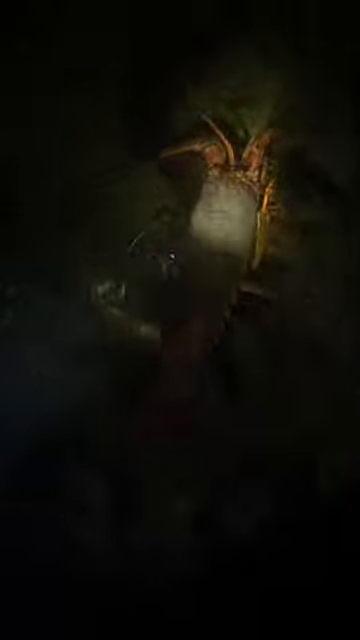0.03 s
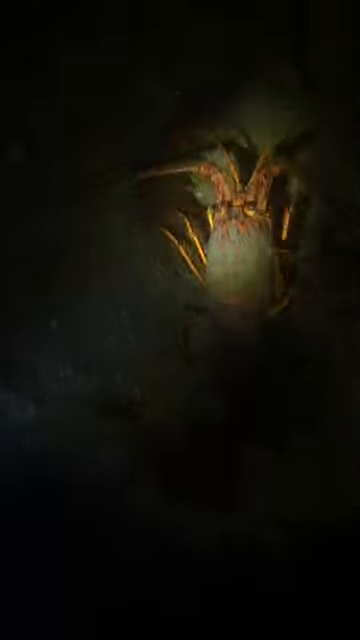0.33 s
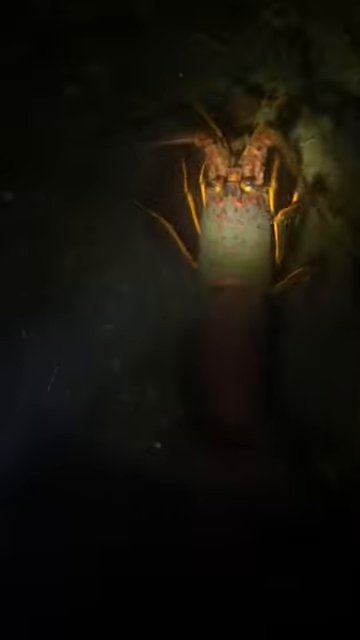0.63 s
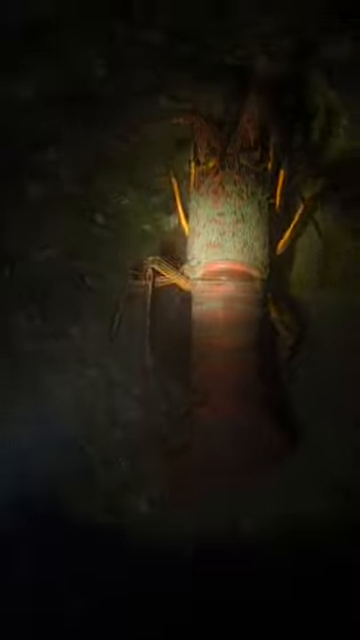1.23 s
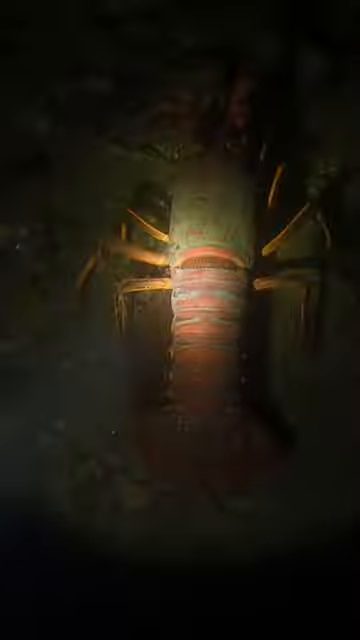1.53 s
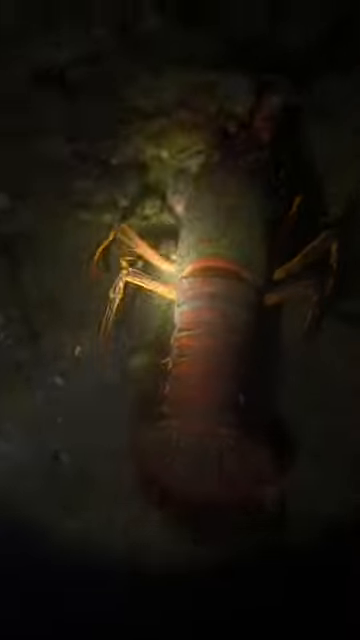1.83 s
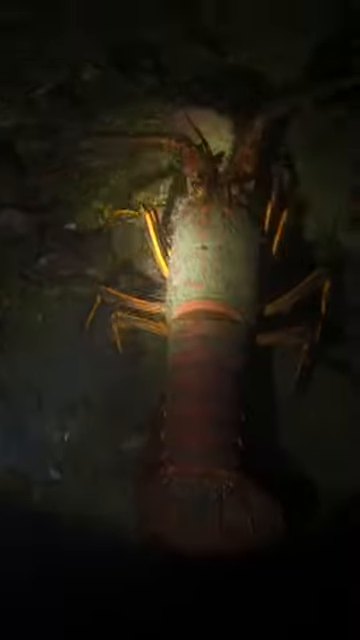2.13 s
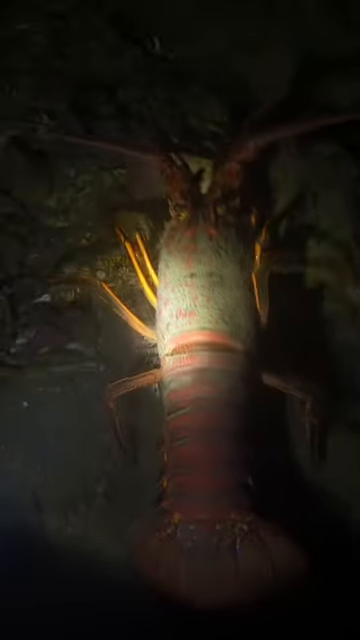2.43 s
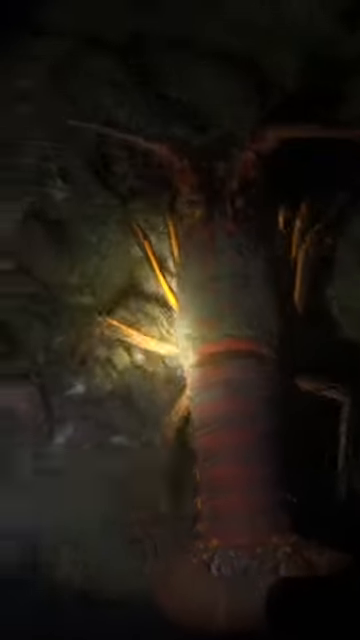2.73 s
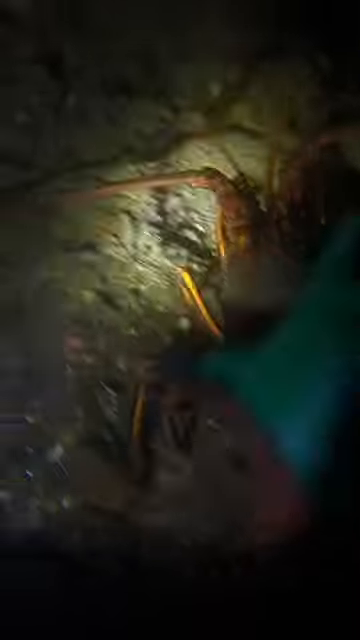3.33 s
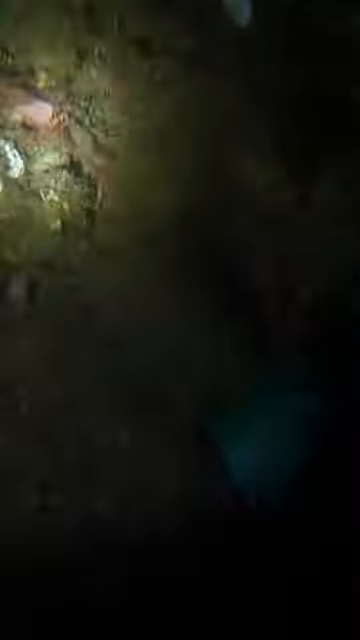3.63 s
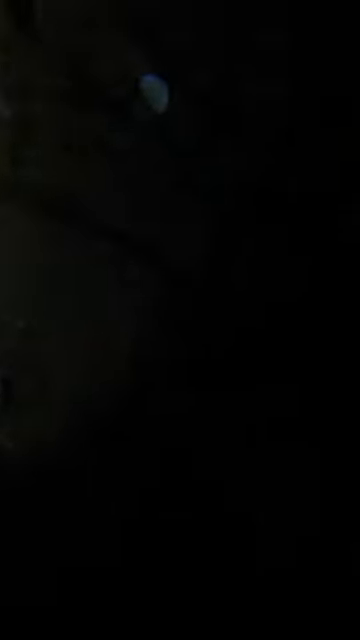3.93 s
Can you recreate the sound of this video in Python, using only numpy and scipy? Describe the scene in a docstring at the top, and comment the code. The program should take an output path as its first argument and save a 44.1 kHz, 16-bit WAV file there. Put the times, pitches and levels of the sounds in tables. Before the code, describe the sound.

A low underwater rumble runs throughout, heard from inside a camera housing, with a faint boat hum and scattered shrimp snaps. Gear bumps softly around 0.9, 2.3 and 2.7 seconds, and two taps come near 2.2. At 3.3 seconds water surges and a lobster's shell faintly scrapes rock. Dull knocks land at 3.4 and, louder, 3.6 seconds, with dry taps and short creaks until 4.

```python
"""A rocky seabed at night, heard from inside a camera housing as a diver grabs a spiny lobster.
Moving water rumbles against the housing and a far boat engine hums. Snapping shrimp crackle all
around; the rocks smear their snaps and the housing rings with them. Gear bumps softly on the seabed.
The grab, a little after three seconds, brings a surge of water, two dull knocks, dry taps on the
housing, short creaks of the gear and scrapes of shell on rock."""
import sys
import numpy as np
from scipy import signal
from scipy.fft import rfft, irfft, next_fast_len
from scipy.io import wavfile
from scipy.ndimage import uniform_filter1d, minimum_filter1d, map_coordinates

SR = 44100
rng = np.random.default_rng(int(sys.argv[2]) if len(sys.argv) > 2 else 0)


def store_wav(level_fs):
    """Save 16-bit WAV to argv[1]."""
    pcm = np.round(np.clip(np.atleast_2d(level_fs), -1, 1) * 32767)
    wavfile.write(sys.argv[1], SR, pcm.T.astype(np.int16))


N = 176400  # 4 seconds

# Levels in the tables are relative. A "decay" is the time a sound takes to fade by 60 dB.
# Water pushing on the housing: time_s, level_db
FLOW_LEVELS = [(0, -31.5), (.7, -39), (.82, -33), (1.0, -32), (1.9, -35), (2.25, -25), (2.38, -22.5),
               (2.46, -26), (2.53, -29.5), (2.7, -27.5), (3.2, -33), (3.32, -18), (3.42, -17.5),
               (3.46, -30), (3.52, -20.5), (3.565, -18), (3.6, -30), (3.69, -36), (3.85, -39.5), (4, -24)]
# Tone of that push: frequency_hz, level_db
FLOW_SPECTRUM = [(8, -1), (18, 9), (36, 1), (50, -1), (70, -15.5), (110, -21), (220, -40.5), (500, -89)]
# The sea's own rumble: time_s, level_db
RUMBLE_LEVELS = [(0, -33), (2.1, -29.5), (2.6, -33), (3.2, -30.5), (3.35, -30.5), (3.58, -24), (3.66, -40),
                 (4, -38.5)]
# Tone of the rumble: frequency_hz, level_db
RUMBLE_SPECTRUM = [(25, -30), (50, -13.5), (66, 2), (80, -7.5), (108, 1.5), (135, -11), (160, -14.5),
                   (220, -20), (500, -84)]
# The wash of water above the rumble: time_s, level_db
WASH_LEVELS = [(0, -37.5), (2.2, -39), (2.6, -40), (3.25, -40), (3.45, -37.5), (3.6, -37.5), (3.66, -53),
               (3.85, -45), (4, -39.5)]
# Tone of the wash: frequency_hz, level_db
WASH_SPECTRUM = [(60, 7.5), (130, -6.5), (200, -2.5), (290, 6.5), (360, -0.5), (470, 2), (620, -5),
                 (800, -24.5), (1200, -29.5), (3000, -76)]
# The engine's low hum: time_s, level_db
HUM_LEVELS = [(0, -32.5), (2.2, -30.5), (3.3, -30.5), (3.58, -33.5), (3.66, -44.5), (4, -36)]
# The engine's higher whine: time_s, level_db
WHINE_LEVELS = [(0, -49), (1.0, -42), (2.1, -44.5), (2.6, -48.5), (3.5, -46), (3.7, -60.5)]
# Crackle of far shrimp: time_s, level_db
CRACKLE_LEVELS = [(0, -59), (1.8, -57), (2.05, -53), (2.45, -56.5), (2.7, -52.5), (3.15, -56), (3.4, -58),
                  (3.58, -56.5), (3.65, -65), (4, -60)]
# The housing's ring under the crackle: frequency_hz, level_db
HOUSING_SPECTRUM = [(1300, -51), (1470, -10), (1510, -2.5), (1580, 0.5), (1630, -11.5), (1800, -51.5)]
# Snaps of nearby shrimp: start_s, level_db, brightness_db_per_octave, decay_s, housing_ring_hz
NEAR_SNAPS = [(.01, -37, 2, 0.065, 1470), (.157, -42, -6, 0.069, 3250), (0.2828, -48, -8, 0.064, 1570),
              (.302, -29.5, -1.5, 0.078, 3200), (0.4375, -30, 1, 0.022, 2420),
              (0.5451, -38.5, 1.5, 0.078, 2380), (0.7403, -33.5, -4, 0.067, 2350),
              (.822, -52, 0, 0.014, 2380), (0.889, -62, -8, 0.022, 1590), (0.9084, -33.5, -1, 0.11, 1530),
              (0.979, -30, -4.5, 0.025, 1560), (1.054, -36.5, 7.5, 0.019, 3280),
              (1.1337, -22.5, 3.5, 0.013, 2550), (1.247, -41, 2, 0.048, 1570),
              (1.3265, -39, 4.5, .05, 2380), (1.341, -39.5, 3, 0.09, 1560), (1.369, -49, 7.5, 0.037, 2380),
              (1.4899, -20, 0, 0.014, 3360), (1.5339, -22, 2, 0.007, 2380), (1.7082, -26, -6, 0.055, 1570),
              (1.713, -26, -3.5, 0.036, 2500), (1.8178, -24, 1, 0.018, 3900), (1.926, -29, 6, 0.02, 1620),
              (1.937, -33, 0.5, 0.055, 2380), (2.0185, -31.5, -2, 0.029, 2380),
              (2.038, -33.5, -2, 0.043, 1510), (2.1148, -29, -3, 0.021, 1590),
              (2.2569, -40, -1.5, 0.14, 3350), (2.4341, -35.5, -7, 0.024, 2400),
              (2.597, -40.5, 0.5, 0.13, 2380), (2.7092, -28, 0.5, 0.016, 1580),
              (2.7354, -32.5, -4.5, 0.07, 2450), (2.828, -36.5, -1.5, 0.037, 2350),
              (3.05, -35.5, -6, 0.065, 1696), (3.136, -45, -5, 0.046, 1570), (3.255, -35.5, 0, 0.022, 4850),
              (3.34, -20, -1, 0.033, 3100), (3.386, -39, 1.5, 0.038, 2900),
              (3.4391, -16, -2.5, 0.015, 1560), (3.453, -26.5, -7, 0.022, 1560),
              (3.5343, -23, -7, 0.018, 4900)]
# Tone of a snap: frequency_hz, level_db
SNAP_SPECTRUM = [(300, -43.5), (800, -26), (1080, -2), (1290, -10.5), (1420, -19), (1510, 5), (1580, 4),
                 (1680, 2.5), (1760, 2), (2020, -5.5), (2380, 3), (2800, -2), (3100, -4), (3380, -2),
                 (3650, -10.5), (4020, -4), (4300, -8.5), (4850, -4.5), (5400, -14.5), (6400, -22.5),
                 (7500, -25.5), (9200, -42), (10500, -42.5), (12500, -41.5), (15000, -58)]
# Which side hears the snaps louder: frequency_hz, left_minus_right_db
SNAP_SIDES = [(700, -9), (1400, 4.5), (2000, -2), (2900, 5.5), (4100, -6), (5800, -3.5), (8000, -0.5),
              (12000, 13.5)]
# How alike crisp sounds are in the two microphones: frequency_hz, likeness (1 or more is identical)
LIKENESS = [(1000, 1.27), (1700, 1.3), (2500, 0.55), (4000, 0), (8000, 0.3)]
# Gear bumping the seabed: start_s, level_db, pitch_hz
GEAR_BUMPS = [(0.911, -19.5, 90), (2.273, -27.5, 181), (2.691, -23.5, 161.7), (3.613, -17, 70),
              (3.84, -27, 170)]
# Taps on the housing: start_s, level_db, left_minus_right_db, rise_s
HOUSING_TAPS = [(2.1443, -16.5, -36, 0.00028), (2.1711, -11, -38.5, 0.000055),
                (3.301, -27, -13.5, 0.000075), (3.4865, -15.5, -36, 0.00021), (3.64, -28.5, 11.5, 0.000068),
                (3.7122, -15.5, -35, 0.000045), (3.7212, -24.5, -24, 0.000068), (3.7607, -19, 2, 0.000014),
                (3.772, -24.5, -4, 0.000012), (3.7831, -15.5, -41, 0.000067), (3.852, -47.5, -1, 0.000036),
                (3.911, -32, -13, 0.00011), (3.922, -25.5, -13, 0.00035), (3.948, -14, -36, 0.00011)]
# Dull knocks: start_s, level_db, starting_pitch_hz, octave_fall_s, decay_s, thud_db, rise_s
DULL_KNOCKS = [(3.376, -13, 493.5, .011, 0.096, 3.5, .0022), (3.6001, 4.5, 565, 0.012, .019, -9.5, 0.00088)]
# Tone of the faint crack in a knock: frequency_hz, level_db
CRACK_SPECTRUM = [(800, -12), (1400, 4.5), (3400, -1), (4500, -18), (8000, -28), (12000, -36), (15000, -55)]
# Creaks of the gear: start_s, length_s, slips_per_s, rasp_db, ring_hz, ring_db
GEAR_CREAKS = [(3.501, .095, 120, -41.5, 2300, -52), (3.724, 0.12, 150, -48, 2710, -41.5),
               (3.887, 0.14, 94, -47.5, 3714, -38.5)]
# Tone of a creak's rasp: frequency_hz, level_db
RASP_SPECTRUM = [(500, -8.5), (1200, 0), (1640, 8.5), (2100, -9), (2700, -4), (3600, 0.5), (5000, -12),
                 (6200, -14), (7500, -20), (9000, -31), (11000, -27), (13000, -28.5), (15000, -46.5)]
# Shell scraping on rock: start_s, length_s, level_db
SHELL_SCRAPES = [(3.324, 0.03, -45), (3.401, 0.012, -40.5), (3.409, .045, -43.5)]
# Tone of a scrape: frequency_hz, level_db
SCRAPE_SPECTRUM = [(700, -5.5), (1600, 11.5), (5000, 0.5), (7000, -7), (9000, -21), (12000, -17),
                   (13500, -30), (16000, -26)]
# Tone of a spine's scratch: frequency_hz, level_db
SCRATCH_SPECTRUM = [(3000, -10.5), (7000, -14.5), (9000, -18), (11500, 0), (13000, -2), (15000, -4.5),
                    (16000, -21.5)]
# How far the left microphone's wave runs ahead of the right one's: frequency_hz, lead_rad
MICROPHONE_LEAD = [(60, 0.26), (150, -.04), (450, 0.16), (780, .4), (1800, 0.71), (2600, 0), (6000, -0.22),
                   (12000, 0)]

LOW_PAN_DB = -1.8  # water, engine and bumps sit a little to the right
HALF_EACH_SIDE = np.array([[.5], [-.5]])  # shares a difference between left and right


def amp(db):
    """Turn decibels into a gain to multiply by."""
    return 10 ** (np.asarray(db) / 20)


def unit(x):
    """Scale a sound to an average strength (rms) of 1."""
    return x / np.sqrt(np.mean(x ** 2) + 1e-20)


def along(points, hz):
    """Read between the rows of a frequency table, on a log scale of frequency."""
    frequencies, values = np.transpose(points)
    return np.interp(np.log(hz + 1), np.log(frequencies + 1), values)


def level(rows):
    """A gain for every sample, from rows of time_s, level_db."""
    return amp(np.interp(np.arange(N) / SR, *np.transpose(rows)))


def wobble(per_s):
    """A smooth curve through per_s random values a second."""
    return map_coordinates(rng.standard_normal(400), [np.arange(N) * per_s / SR], mode="wrap")


def filtered(x, response):
    """Multiply each frequency in a sound by response(hz)."""
    padded = next_fast_len(x.shape[-1] + 4096)
    hz = np.fft.rfftfreq(padded, 1 / SR)
    return irfft(rfft(x, padded) * response(hz), padded)[..., :x.shape[-1]]


def pan(db):
    """Left and right gains; positive db turns the right down, negative the left."""
    return amp(np.minimum([[db], [-db]], 0))


def fade(t, decay_s):
    """Die away by 60 dB every decay_s."""
    return np.exp(-np.log(1000) * t / decay_s)


def rise(t, rise_s, power=1):
    """Climb from 0 towards 1; power 2 starts more gently."""
    return 1 - np.exp(-(t / rise_s) ** power)


def falling(t, hz, fall_s):
    """A tone whose pitch has halved after fall_s and goes on sinking."""
    return np.sin(2 * np.pi * hz * fall_s * np.log1p(t / fall_s))


def add(out, start_s, sound):
    """Mix a sound in at start_s."""
    i = max(0, round(start_s * SR))
    out[:, i:i + sound.shape[-1]] += sound[..., :max(0, N - i)]


def noise(spectrum, size=N, likeness=LIKENESS):
    """Stereo noise with a given tone: a part both sides share (mid), plus or minus another (side)."""
    def response(hz):
        width = np.arccos(np.clip(along(likeness, hz), -1, 1)) / 2
        return amp(along(spectrum, hz)) * [np.cos(width), np.sin(width)]
    mid, side = filtered(rng.standard_normal((2, size)), response)
    return unit(np.array([mid + side, mid - side]))


def patchy(x, depth_db):
    """Let the tone change at random from moment to moment."""
    bands = signal.stft(x, nperseg=512)[2]
    patches = uniform_filter1d(rng.standard_normal(bands.shape[1:]), size=6, axis=0)  # across frequency
    patches = uniform_filter1d(patches, size=5, axis=1)  # across time
    return signal.istft(bands * amp(depth_db * unit(patches)), nperseg=512)[1][:, :N]


def distant(x, cutoff_hz=8000):
    """Far sounds lose their top treble."""
    return filtered(x, lambda hz: 1 / np.sqrt(1 + (hz / cutoff_hz) ** 10))


def water():
    """Water buffets the housing, over the sea's deep rumble and a higher wash."""
    flow = level(FLOW_LEVELS) * noise(FLOW_SPECTRUM, likeness=[(50, 1)]) * amp(4)
    rumble = level(RUMBLE_LEVELS) * noise(RUMBLE_SPECTRUM, likeness=[(80, 1)]) * amp(.9 * wobble(5.94))
    wash = level(WASH_LEVELS) * noise(WASH_SPECTRUM, likeness=[(300, .96)]) * amp(2.5 + .5 * wobble(20))
    return (flow + rumble + wash) * pan(LOW_PAN_DB)


def engine(hum_hz=127.05, whine_hz=315.2, drift=.007, waver_db=1):
    """A far boat engine: two wavering tones that drift in pitch together."""
    clock = np.cumsum(1 + drift * wobble(7)) / SR
    tone = lambda rows, hz: level(rows) * amp(waver_db * wobble(13)) * np.sin(2 * np.pi * hz * clock)
    return np.sqrt(2) * (tone(HUM_LEVELS, hum_hz) + tone(WHINE_LEVELS, whine_hz)) * pan(LOW_PAN_DB)


def small_shrimp(ticks_per_s=45):
    """Small shrimp make tiny sharp ticks at random moments."""
    t = np.arange(SR // 30) / SR
    sizes = rng.uniform(.3, 1, N) * (rng.random(N) < ticks_per_s / SR)
    shape = signal.fftconvolve(sizes, fade(t, .012) * rise(t, .0004))[:N]
    ticks = unit(distant(shape * noise(SNAP_SPECTRUM)))
    return level(CRACKLE_LEVELS) * amp(-6) * ticks


def housing_ring():
    """The crackle keeps the housing ringing softly."""
    return level(CRACKLE_LEVELS) * amp(-9) * noise(HOUSING_SPECTRUM)


def far_shrimp(snaps_per_s=130, spread_db=3.5, fizz=.26):
    """A far crowd of snaps blurs into a dull crackle over an even fizz."""
    t = np.arange(SR // 5) / SR
    sizes = amp(spread_db * np.minimum(rng.exponential(size=N), 3.3))
    sizes *= rng.random(N) < snaps_per_s / SR
    shape = rise(t, .0013, power=2) * fade(t, .047)
    energy = np.abs(signal.fftconvolve(sizes ** 2, shape ** 2)[:N])
    hiss = distant(patchy(noise(SNAP_SPECTRUM), depth_db=1.5))
    return level(CRACKLE_LEVELS) * unit(np.sqrt(energy + fizz * energy.mean()) * hiss)


def through_housing(snap, bright_db, ring_hz, second_ring_hz=1730, width_hz=140):
    """Brighten or dull a snap, and boost two pitches at which the housing rings."""
    tilt = lambda hz: amp(bright_db * np.log2(np.clip(hz, 500, 6000) / 2200))
    peak = lambda hz, centre_hz, db: amp(db) / (1 + ((hz - centre_hz) / width_hz) ** 2)
    rings = lambda hz: 2 + peak(hz, ring_hz, db=8) + peak(hz, second_ring_hz, db=-7)
    return unit(filtered(snap, lambda hz: tilt(hz) * rings(hz)))


def near_shrimp():
    """Single close snaps, each with a faint tail of echo from the rocks."""
    out, t = np.zeros((2, N)), np.arange(SR // 5) / SR
    echo = amp(-22) * fade(t, .19)
    for start_s, db, bright_db, decay_s, ring_hz in NEAR_SNAPS:
        shape = rise(t, .0013, power=2) * (fade(t, decay_s) + echo)
        snap = through_housing(noise(SNAP_SPECTRUM, len(t)), bright_db, ring_hz)
        add(out, start_s, amp(db - 2.5) * shape * snap)
    return out


def gear_bumps():
    """Gear meets the seabed in soft, low bumps that die quickly."""
    out, t = np.zeros((2, N)), np.arange(SR // 5) / SR
    shape = rise(t, .0028, power=2) * fade(t, .085)
    for start_s, db, hz in GEAR_BUMPS:
        add(out, start_s, 2 * amp(db) * np.sin(2 * np.pi * hz * t) * shape * pan(LOW_PAN_DB))
    return out


def housing_taps():
    """Each tap starts as a sharp tick, most of them beside one microphone, and sinks into a low bump."""
    out, t = np.zeros((2, N)), np.arange(SR // 10) / SR
    bump = falling(t, hz=1450, fall_s=.00035) * fade(t, .063)
    tick = amp(-10) * fade(t, .002) * (1 - fade(t, .001))
    for start_s, db, side_db, rise_s in HOUSING_TAPS:
        add(out, start_s, -amp(db) * (bump * rise(t, rise_s) + tick) * pan(side_db))
    return out


def knocks(muffle_hz=1000, left_lead_s=.000067):
    """A hollow falling knock and the thud of water pushed aside, both muffled, with a faint crack."""
    out, t = np.zeros((2, N)), np.arange(SR // 5) / SR
    muffle = signal.butter(2, muffle_hz, fs=SR, output="sos")
    for start_s, db, hz, fall_s, decay_s, thud_db, rise_s in DULL_KNOCKS:
        ring = falling(t, hz, fall_s) * fade(t, decay_s) * rise(t, rise_s, power=2)
        thud = amp(thud_db) * falling(t, hz=153.3, fall_s=.026) * fade(t, .077) * rise(t, .00094)
        crack = amp(-29.5) * fade(t, .012) * rise(t, .00044) * noise(CRACK_SPECTRUM, len(t))
        add(out, start_s, amp(db) * (crack - signal.sosfilt(muffle, ring + thud)) * pan(1))
    return filtered(out, lambda hz: np.exp(2j * np.pi * hz * left_lead_s * HALF_EACH_SIDE))


def gear_creaks(unevenness=.31, sharpness=2.8, pitch_wander=.07):
    """Gear sticks and slips in quick runs; each slip rasps and rings briefly."""
    out = np.zeros((2, N))
    for start_s, length_s, slips_per_s, rasp_db, ring_hz, ring_db in GEAR_CREAKS:
        size = int(length_s * SR)
        rate = slips_per_s * (1 + unevenness * wobble(27)[:size])
        cycle = np.cumsum(rate) / SR % 1  # runs from 0 to 1 during each slip
        age = cycle / slips_per_s
        rasp = np.exp(-sharpness * cycle) * rise(age, .0002) * noise(RASP_SPECTRUM, size)
        pitch_hz = ring_hz * (1 + pitch_wander * wobble(900)[:size])
        tone = np.sin(2 * np.pi * np.cumsum(pitch_hz) / SR)
        ring = tone * fade(age, .011) * rise(age, .0018, power=2)
        add(out, start_s, amp(rasp_db) * rasp + amp(ring_db) * ring)
    return out


def lobster(grain_db=2.5, scratch_at_s=3.4245):
    """The shell drags over rock in short grainy strokes, and a spine scratches once."""
    out, t = np.zeros((2, N)), np.arange(SR // 20) / SR
    for start_s, length_s, db in SHELL_SCRAPES:
        size = int(length_s * SR)
        stroke = np.sin(np.linspace(0, np.pi, size)) * amp(grain_db * wobble(270)[:size])
        add(out, start_s, amp(db) * stroke * noise(SCRAPE_SPECTRUM, size))
    scratch = fade(t, .009) * rise(t, .0006) * noise(SCRATCH_SPECTRUM, len(t))
    add(out, scratch_at_s, amp(-36) * scratch)
    return out


def scene():
    """Everything that reaches the housing, from the background to the lobster."""
    background = water() + engine()
    snaps = filtered(far_shrimp() + near_shrimp(), lambda hz: amp(along(SNAP_SIDES, hz) * HALF_EACH_SIDE))
    shrimp = snaps + small_shrimp() + housing_ring()
    return background + shrimp + gear_bumps() + housing_taps() + knocks() + gear_creaks() + lobster()


def record(dry, ceiling=.92, smooth_s=.006, top_hz=15500):
    """A limiter turns peaks down, the two sides shift slightly in time, and the top treble is cut."""
    size = int(smooth_s * SR)
    needed_gain = ceiling / np.maximum(np.abs(dry).max(axis=0), ceiling)
    smooth_gain = uniform_filter1d(minimum_filter1d(needed_gain, size=2 * size), size=size)
    shift = lambda hz: np.exp(1j * along(MICROPHONE_LEAD, hz) * HALF_EACH_SIDE)
    return filtered(dry * smooth_gain, lambda hz: (hz < top_hz) * shift(hz))


dry = scene()
out = record(dry)
store_wav(out)
```